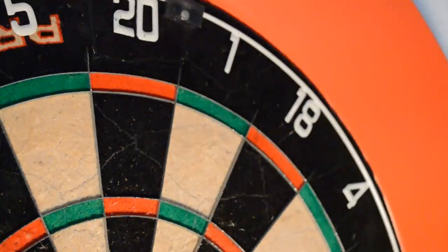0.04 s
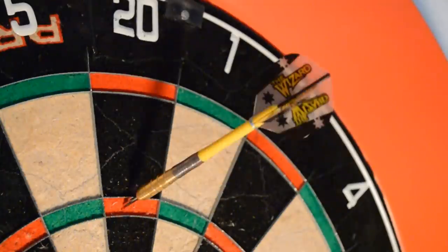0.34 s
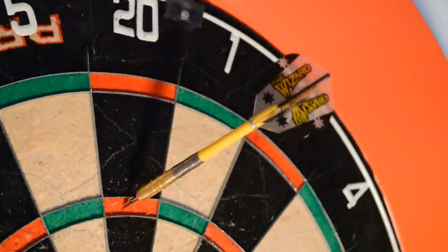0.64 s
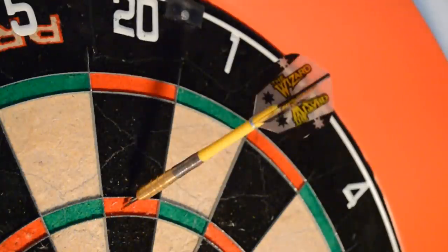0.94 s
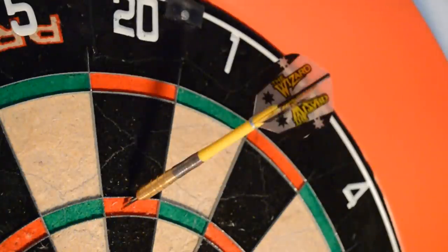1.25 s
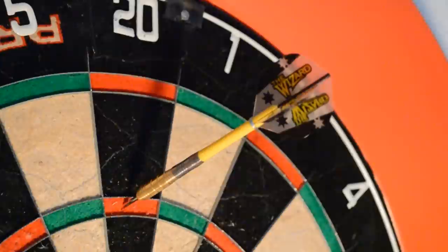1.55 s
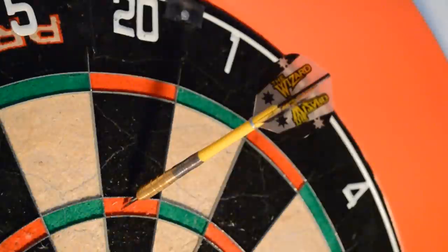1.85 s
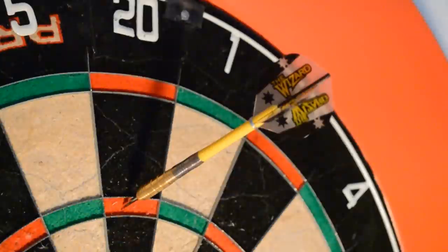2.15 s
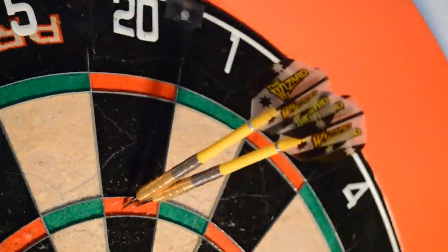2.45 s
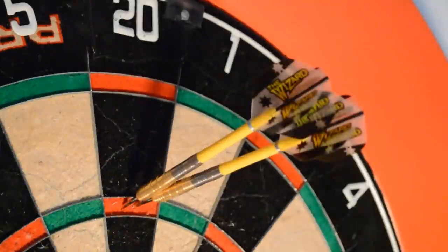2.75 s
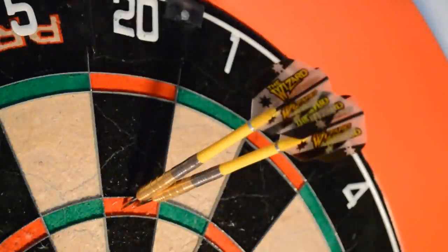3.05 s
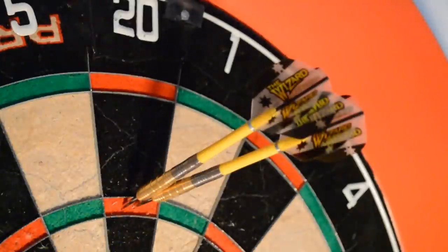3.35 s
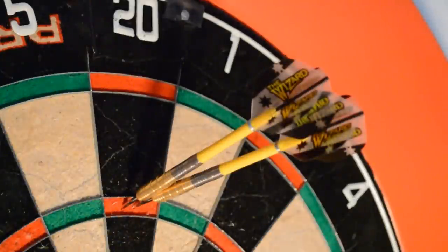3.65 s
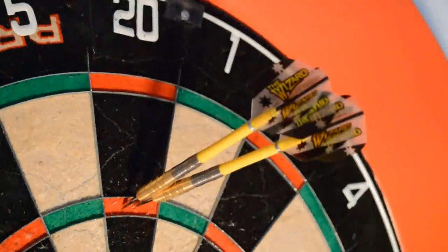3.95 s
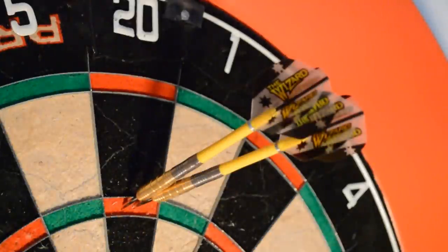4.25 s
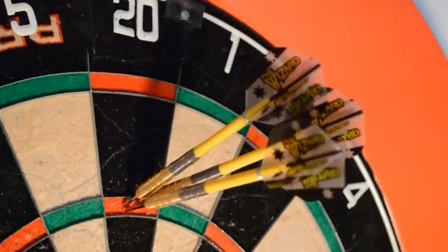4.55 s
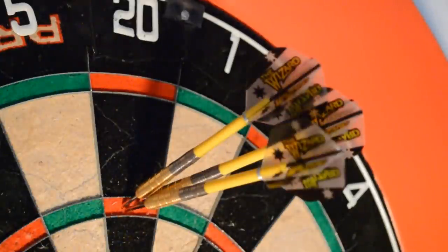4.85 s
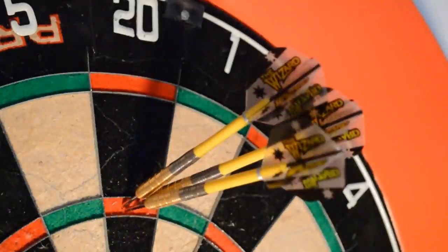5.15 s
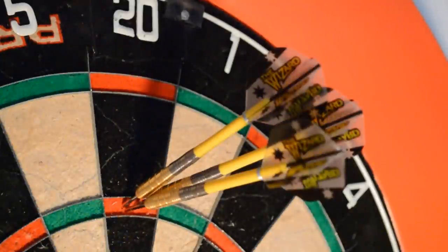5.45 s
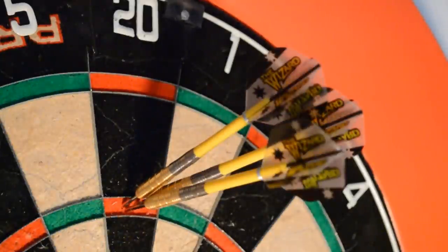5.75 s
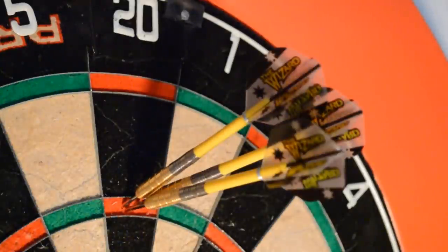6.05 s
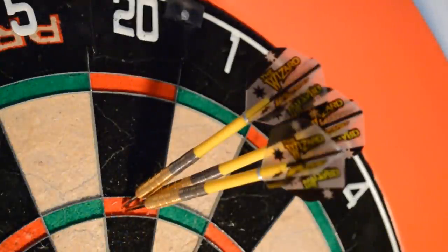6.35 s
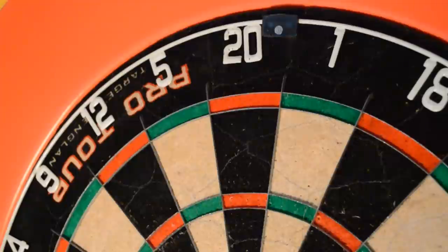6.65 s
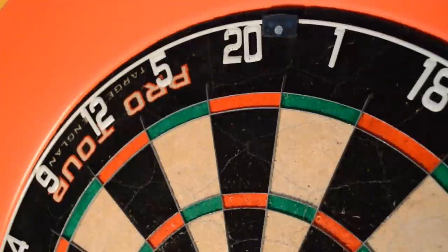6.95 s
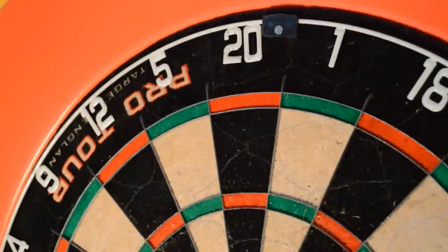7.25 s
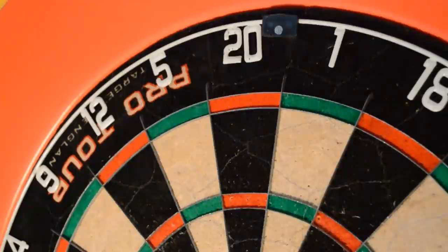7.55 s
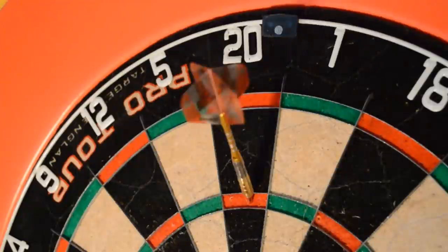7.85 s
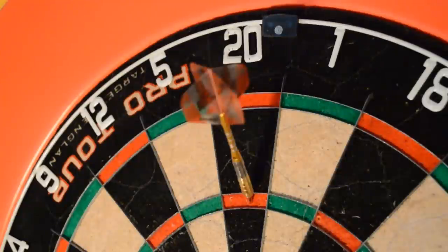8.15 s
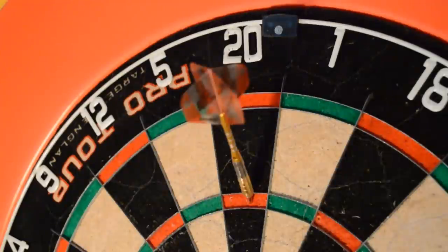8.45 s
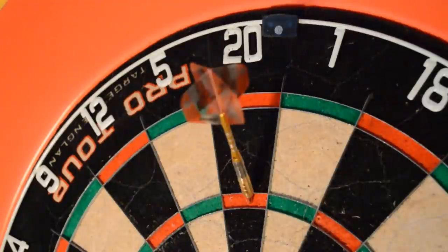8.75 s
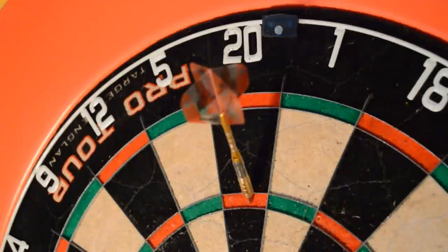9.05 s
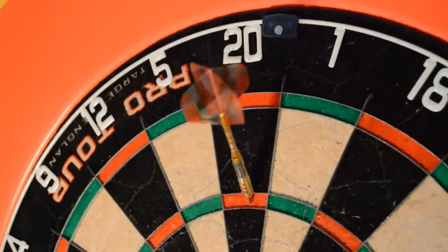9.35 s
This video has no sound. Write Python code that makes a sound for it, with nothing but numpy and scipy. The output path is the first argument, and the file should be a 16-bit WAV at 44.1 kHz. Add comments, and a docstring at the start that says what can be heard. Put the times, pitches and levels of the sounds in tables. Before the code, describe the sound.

Four steel-tip darts strike a bristle board, heard close up in a small, quiet room with faint hum and hiss. The first lands with a dull thud. The next two clatter against darts already stuck there as they bite in. Faint ticks, rustling clothes and two soft steps follow, the hum rises slightly, and the last dart thuds in cleanly, with spare darts clinking faintly in the hand.

```python
"""Four steel-tip darts hit a bristle board, close by, in a small room with hum, hiss and a thin whine.
After a faint rustle and tick, the first lands freely at 0.5 s: the point drives the board, a dull thud.
At 2.7 s and 4.7 s the next two clatter along the darts already stuck there before they bite.
Ticks, rustling clothes and two soft steps follow at the thrower's end; at 6.6 s the hum rises with a
brief rumble. The last dart lands freely at 8.0 s, and spare darts clink in the hand."""
import sys
import numpy as np
from scipy import signal
from scipy.fft import rfft, irfft, next_fast_len
from scipy.io import wavfile
from scipy.ndimage import uniform_filter1d, minimum_filter1d

SR = 44100
rng = np.random.default_rng(int(sys.argv[2]) if len(sys.argv) > 2 else 0)


def wrap_up_sound(samples):
    """Save the sound to the file named by the first command line argument, as 16-bit audio."""
    columns = np.atleast_2d(samples).T
    # keep every value between -1 and 1, then stretch to whole-number steps
    tamed = np.clip(columns, -1, 1)
    steps = np.round(tamed * 32767).astype(np.int16)
    wavfile.write(sys.argv[1], SR, steps)


N = 414099
TIME_S = np.arange(N) / SR
EVENT_N = SR // 2
EVENT_S = np.arange(EVENT_N) / SR


def undb(db):
    """Decibels to gain."""
    return 10 ** (np.asarray(db) / 20)


def add(track, start_s, sound):
    """Mix a sound into the track."""
    i = int(start_s * SR)
    track[i:i + len(sound)] += sound[:N - i]


def on_log(hz, points):
    """Interpolate (frequency [Hz], value) points over log frequency."""
    point_hz, value = np.transpose(points)
    return np.interp(np.log(hz + 1e-9), np.log(point_hz), value)


def noise(gain_at, size):
    """Unit-rms noise with spectrum gain_at(hz)."""
    n = next_fast_len(size)
    hz = np.fft.rfftfreq(n, 1 / SR)
    phases = np.exp(2j * np.pi * rng.random(len(hz)))
    y = irfft(gain_at(hz) * phases, n)[:size]
    return y / np.std(y)


def coloured(points, size):
    """Unit-rms noise shaped by (frequency [Hz], level [dB]) points."""
    return noise(lambda hz: undb(on_log(hz, points)), size)


def band(centre_hz, width_hz, size):
    """Unit-rms noise in one resonance."""
    return noise(lambda hz: 1 / (1 + ((hz - centre_hz) / width_hz * 2) ** 2), size)


def modes(table):
    """Velocity impulse response of damped modes."""
    return sum(undb(db) * np.cos(2 * np.pi * hz * EVENT_S) * undb(-60 * EVENT_S / t60_s)
               for hz, db, t60_s in table)


def fade(tau_ms):
    """Exponential decay."""
    return np.exp(-EVENT_S * 1000 / tau_ms)


def through(x, response):
    """Convolve with an impulse response."""
    return signal.oaconvolve(x, response)[:N]


def push(length_ms):
    """Force pulse of area 1: the longer, the duller."""
    force = EVENT_S * fade(length_ms / 4)
    return force / force.sum()


def tap(resonances, rise_ms, decay_ms):
    """Short swell of noise in (centre [Hz], width [Hz], level [dB]) resonances."""
    ring = sum(undb(db) * band(hz, width_hz, EVENT_N) for hz, width_hz, db in resonances)
    return ring * fade(decay_ms) * (1 - fade(rise_ms))


# Board on its mount: (frequency [Hz], level [dB], t60 [s])
BOARD_MODES = [(93.5, -31.5, 0.018), (218, -23, 0.042), (270, -26.5, .035), (413, -8.5, 0.041),
               (620, -19.5, .03), (880, -24.5, .025), (1290, -28, 0.014), (1620, -28.5, .012)]
# Wall and the air before it: (frequency [Hz], level [dB], t60 [s])
WALL_MODES = [(47.5, -41, 0.58), (60.88, -42, 0.45), (207, -42, 0.21), (243, -44.5, 0.22),
              (362, -48.5, 0.39), (386, -44, 0.22), (440, -48.5, .17), (468, -48, 0.13), (595, -47, 0.2),
              (645, -45, .18), (688, -46.5, .2), (870, -43.5, 0.22)]
# Throws: (time [s], thud [dB], knock [dB], knock edge [Hz], point ring [Hz], push length [ms],
# rebound delay [ms], board mode favoured by the spot [Hz])
THROWS = [(0.4918, 1, -23.5, 1435, 9580, 0.79, 5.35, 742), (2.7080, -3, -25, 1001, 10200, 0.62, 6.36, 865),
          (4.7372, -6, -25, 1248, 9300, 0.43, 5.8, 789), (7.9730, 1.5, -21, 1200, 11400, 0.8, 4.24, 652)]


def landings(sink_s=0.0033, bite_ms=0.83, entry_db=-5.5, rebound_db=-11, spot_db=-21, spot_t60_s=0.064):
    """The point sinks in, stops and drives the board against its mount, which springs back."""
    board, wall = np.zeros(N), np.zeros(N)
    board_ring, wall_ring = modes(BOARD_MODES), modes(WALL_MODES)
    for start_s, thud_db, knock_db, edge_hz, point_hz, push_ms, rebound_ms, spot_hz in THROWS:
        force = np.zeros(2 * EVENT_N)
        add(force, 0, undb(thud_db + entry_db) * push(length_ms=3))
        add(force, sink_s, -undb(thud_db) * push(push_ms))
        add(force, sink_s + rebound_ms / 1000, undb(thud_db + rebound_db) * push(push_ms))
        spot_ring = modes([(spot_hz, spot_db, spot_t60_s)])
        add(board, start_s, through(force, board_ring + spot_ring))
        add(wall, start_s, through(force, wall_ring))
        add(board, start_s, scratch(point_hz, sink_s, bite_ms))
        add(board, start_s + sink_s, undb(knock_db) * knock(edge_hz, bite_ms))
    return board, wall


# Sisal fibres: (frequency [Hz], relative level [dB])
SISAL_SPECTRUM = [(300, 0), (2500, 0.5), (5000, -1.5), (7000, -0.5), (8200, -5.5), (10000, 0.5),
                  (12500, -3), (14000, -13), (16000, -16.5)]


def scratch(point_hz, sink_s, rise_ms, decay_ms=3, gain_db=-34, point_db=-2, width_hz=1300):
    """Friction builds as the point goes deeper and makes the steel sing."""
    friction = (1 - fade(rise_ms)) * (1 + EVENT_S / sink_s) ** 1.3 * fade(decay_ms)
    fibres = coloured(SISAL_SPECTRUM, EVENT_N)
    steel = undb(point_db) * band(point_hz, width_hz, EVENT_N)
    return undb(gain_db) * (fibres + steel) * friction


# Dense board modes: (frequency [Hz], relative level [dB])
KNOCK_SPECTRUM = [(40, -41.5), (120, -13), (300, -6.5), (480, -4.5), (750, 2), (1300, 0.5), (2000, -1.5),
                  (3000, -3.5), (6000, -7.5)]


def knock(edge_hz, rise_ms, decay_ms=7, smooth_bins=40):
    """The board's overlapping higher modes blur into a short noise."""
    decay = fade(decay_ms)
    spectrum = rfft(rng.standard_normal(EVENT_N) * decay * (1 - fade(rise_ms)))
    flat = spectrum / np.sqrt(uniform_filter1d(abs(spectrum) ** 2, smooth_bins))
    hz = np.fft.rfftfreq(EVENT_N, 1 / SR)
    colour = undb(on_log(hz, KNOCK_SPECTRUM)) / np.hypot(1, (hz / edge_hz) ** 3)
    taper = (1 - EVENT_S / EVENT_S[-1]) ** 2
    burst = irfft(flat * colour) * taper
    return burst * np.linalg.norm(decay) / np.linalg.norm(burst)


# Glancing touch, hard stop, last slap: (time [s], level [dB], loss per rebound [dB], body shelf [dB])
DART_CLASHES = [(2.6905, -10, 1.5, -11), (2.7037, -0.5, 6.5, -7), (2.7194, -14, 4.5, 5),
                (4.7174, -4, 5.5, 4), (4.7311, 0, 7, -7), (4.7390, -16.5, 1.5, -0.5)]


def clashes(contacts=4, first_gap_s=0.0035, gap_ratio=0.9, body_hz=3500):
    """Dart hits dart and rebounds, sooner and weaker each time; a low shelf sets each clash's body."""
    out = np.zeros(N)
    low_pass = signal.butter(1, body_hz, fs=SR)
    for start_s, db, loss_db, body_db in DART_CLASHES:
        for k in range(contacts):
            hit = contact()
            shelved = hit + (undb(body_db) - 1) * signal.lfilter(*low_pass, hit)
            add(out, start_s, undb(db - k * loss_db) * shelved)
            start_s += first_gap_s * gap_ratio ** k
    return out


# Barrel, shaft and flight: (frequency [Hz], level [dB], t60 [s])
DART_MODES = [(1900, -5, 0.036), (2019, -5, 0.09), (2600, -11, 0.037), (3100, -12, 0.035),
              (3850, -17, 0.028), (4550, -2, 0.027), (4976, -2, 0.026), (5200, -2, 0.027),
              (5140, -0.5, 0.05), (5730, -1.5, 0.031), (6080, -4, .03), (7000, -6, 0.025),
              (7480, -2.5, 0.019), (8270, -6.5, 0.026), (8880, -4, .025), (8940, -1, .035),
              (9300, -1.5, 0.054), (10080, 0, 0.039), (10320, 0, 0.065), (11150, 0, 0.029),
              (12000, -5.5, 0.023)]
# Crack of the flights: (frequency [Hz], relative level [dB])
CRACK_SPECTRUM = [(60, -13), (400, -6.5), (1200, -4.5), (2000, -2), (3000, -6), (4200, -4.5), (5200, 2),
                  (7800, -4), (10300, 3.5), (11800, -4.5), (13500, -14), (16000, -25)]


def contact(crack_ms=2.4, scrape_ms=0.8, ring_db=-6.5):
    """The flights crack and a short scrape rings the darts."""
    crack = coloured(CRACK_SPECTRUM, EVENT_N) * fade(crack_ms)
    scrape = rng.standard_normal(EVENT_N) * fade(scrape_ms)
    ring = through(scrape, modes(DART_MODES))[:EVENT_N]
    return crack + undb(ring_db) * ring * np.linalg.norm(crack) / np.linalg.norm(ring)


# Wall colour: (frequency [Hz], relative level [dB])
ROOM_SPECTRUM = [(40, -12.5), (150, -5.5), (300, -3), (450, -1.5), (700, 5), (1100, 0.5), (2000, .5),
                 (3500, 0), (5000, -3), (8000, -3.5), (10000, -4), (13000, -8), (16000, -17)]
# Reverberation: (frequency [Hz], t60 [s])
ROOM_DECAY = [(60, .45), (200, 0.26), (700, 0.35), (2000, 0.28), (5000, .27), (10000, 0.18), (15000, 0.21)]


def room(x, wet_db=-14, first_s=0.0049, build_s=0.01, smooth_bins=45):
    """Reflections thicken after the direct sound; the treble dies first."""
    white = rfft(rng.standard_normal(EVENT_N), 2 * EVENT_N)
    hz = np.fft.rfftfreq(2 * EVENT_N, 1 / SR)
    octave = np.log2(np.clip(hz, 2 ** 6, 2 ** 14))
    onset = np.clip((EVENT_S - first_s) / build_s, 0, 1)
    tail = np.zeros(EVENT_N)
    for k in range(6, 15):
        octave_noise = irfft(white * np.maximum(0, 1 - abs(octave - k)))[:EVENT_N]
        tail += octave_noise * undb(-60 * EVENT_S / on_log(2 ** k, ROOM_DECAY))
    # Diffuse field: even energy across neighbouring frequencies.
    spectrum = rfft(tail * onset, 2 * EVENT_N)
    power = uniform_filter1d(uniform_filter1d(abs(spectrum) ** 2, smooth_bins), smooth_bins)
    flat = spectrum / np.sqrt(power)
    tail = irfft(flat * undb(on_log(hz, ROOM_SPECTRUM)))[:EVENT_N] * onset
    return through(x, undb(wet_db) * tail / np.linalg.norm(tail))


# Dull ticks: (time [s], level [dB], centre and width [Hz])
HAND_TICKS = [(0.263, -50, 2400), (2.462, -56, 3430), (5.108, -50.5, 1220), (5.39, -53.5, 2500),
              (5.675, -57, 1600), (6.536, -53, 1760)]
# Spare darts touching: (time [s], level [dB])
HAND_CLINKS = [(0.796, -54.5), (7.18, -63), (8.307, -59), (8.360, -53.5)]
# Clink resonances: (centre [Hz], width [Hz], relative level [dB])
CLINK_BANDS = [(4000, 660, -4), (5370, 2500, -3), (7800, 900, -9), (10200, 1100, -5.5)]


def handling():
    """Darts tick and clink in the thrower's hand."""
    out = np.zeros(N)
    for start_s, db, hz in HAND_TICKS:
        add(out, start_s, tap([(hz, hz, db)], rise_ms=2.7, decay_ms=16))
    for start_s, db in HAND_CLINKS:
        add(out, start_s, undb(db) * tap(CLINK_BANDS, rise_ms=1.5, decay_ms=24))
    return out


# Soft steps: (time [s], level [dB])
FOOTFALLS = [(5.505, -56.5), (6.179, -54.5)]


def footfalls(thump_hz=115, width_hz=240):
    """Each step thumps the floor once."""
    out = np.zeros(N)
    for start_s, db in FOOTFALLS:
        add(out, start_s, tap([(thump_hz, width_hz, db)], rise_ms=4.6, decay_ms=51))
    return out


# Thrower's movements: (start [s], end [s], level [dB])
MOVEMENTS = [(0.183, 0.3, -67.5), (5.245, 6.454, -64), (6.443, 6.556, -55.5)]
# Rubbing cloth: (frequency [Hz], relative level [dB])
CLOTH_SPECTRUM = [(100, -1), (500, 0.5), (1500, 0.5), (3000, -4.5), (7500, -11), (10500, -6.5),
                  (13000, -24), (16000, -33)]


def clothes(flutter_db=2.5, attack_s=0.067, release_s=0.03):
    """Cloth rubs unevenly: each movement swells, holds and stops."""
    effort = np.zeros(N)
    for start_s, end_s, db in MOVEMENTS:
        attack = np.clip((TIME_S - start_s) / attack_s, 0, 1)
        release = np.clip(1 - (TIME_S - end_s) / release_s, 0, 1)
        effort += undb(db) * attack * release
    flutter = undb(flutter_db * band(0, width_hz=30, size=N))
    return effort * flutter * coloured(CLOTH_SPECTRUM, N)


HUM_RISE_S = 6.57


def rumble(db=-56, centre_hz=70, width_hz=110, decay_s=0.23):
    """A low rumble sets in with the stronger hum and dies away."""
    age_s = TIME_S - HUM_RISE_S
    envelope = (age_s > 0) * np.exp(-abs(age_s) / decay_s)
    return undb(db) * band(centre_hz, width_hz, N) * envelope


# Hiss before and after the hum rises: (frequency [Hz], relative level [dB])
EARLY_HISS_SPECTRUM = [(88, -34.5), (150, -7), (234, -3.5), (267, -3.5), (972, -6), (1300, -7.5),
                       (2700, -8), (2970, -10.5), (15000, -17.5)]
LATE_HISS_SPECTRUM = [(88, -31), (150, -8), (182, -1), (425, -8), (567, -7), (1910, -11.5), (2310, -8.5),
                      (3270, -15.5), (4540, -16), (6680, -17.5), (15000, -22.5)]
# Whirr of small motors: (centre [Hz], width [Hz], early level [dB], late level [dB], flutter [dB])
MOTOR_BANDS = [(52, 35, -73, -69.5, 0.5), (88, 5, -89.5, -69, -2), (119, 6, -82, -76.5, 2.5),
               (177, 4, -87, -73, -0.5), (240, 24, -84, -77, -0.5), (1050, 230, -76.5, -76, 0),
               (2324, 110, -75.5, -71.5, 3.5), (2760, 270, -74.5, -72, 2.5), (4620, 220, -89.5, -74, 2.5),
               (5141, 200, -94.5, -80, 2.5)]
# Motor and mains hum: (frequency [Hz], early level [dB], late level [dB])
HUM_TONES = [(49.6, -70.5, -80), (60.5, -75, -67), (121.2, -76.5, -72)]


def background(early_hiss_db=-62.26, late_hiss_db=-61, rise_s=0.013, whine_hz=15703.5, whine_db=-72.5):
    """Hiss, motor whirr, mains hum and an electronic whine; the hum is stronger for the last throw."""
    late = np.clip((TIME_S - HUM_RISE_S) / rise_s, 0, 1)
    flutter = band(0, width_hz=72, size=N)
    out = (1 - late) * undb(early_hiss_db) * coloured(EARLY_HISS_SPECTRUM, N)
    out += late * undb(late_hiss_db) * coloured(LATE_HISS_SPECTRUM, N)
    for hz, width_hz, early_db, late_db, flutter_db in MOTOR_BANDS:
        level_db = early_db + late * (late_db - early_db) + flutter_db * flutter
        out += undb(level_db) * band(hz, width_hz, N)
    for hz, early_db, late_db in HUM_TONES:
        rms = (1 - late) * undb(early_db) + late * undb(late_db)
        out += rms * np.sqrt(2) * np.sin(2 * np.pi * hz * TIME_S)
    whine = undb(whine_db) * np.sqrt(2) * np.sin(2 * np.pi * whine_hz * TIME_S)
    return out + whine


def scene():
    """Board and darts close by, the room behind them; mono."""
    board, wall = landings()
    near = board + clashes()
    far = handling() + footfalls() + rumble() + clothes()
    return (near + wall + room(near) + far + background())[None]


def record(dry, ceiling=0.65, window_samples=21, low_cut_hz=30, high_cut_hz=16150):
    """Fast peak limiter, then low cut and high cut."""
    needed_gain = ceiling / np.maximum(abs(dry), ceiling)
    gain = uniform_filter1d(minimum_filter1d(needed_gain, window_samples), window_samples)
    high_pass = signal.butter(2, low_cut_hz, "high", fs=SR, output="sos")
    low_pass = signal.firwin(255, high_cut_hz, window=("kaiser", 8), fs=SR)
    limited = signal.sosfilt(high_pass, dry * gain)
    return signal.oaconvolve(limited, low_pass[None], "same")


dry = scene()
out = record(dry)
wrap_up_sound(out)
```